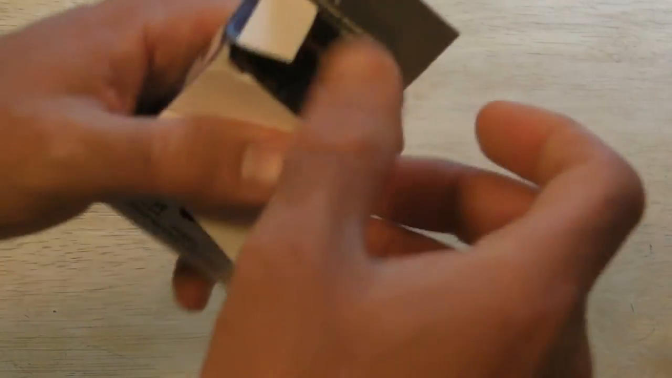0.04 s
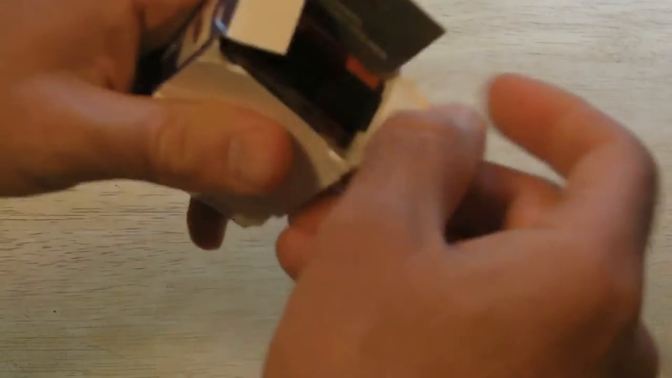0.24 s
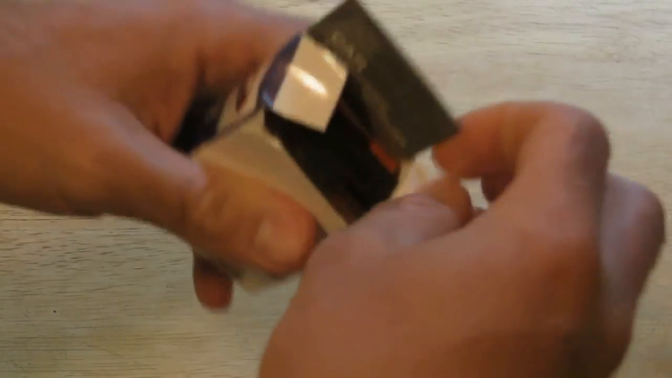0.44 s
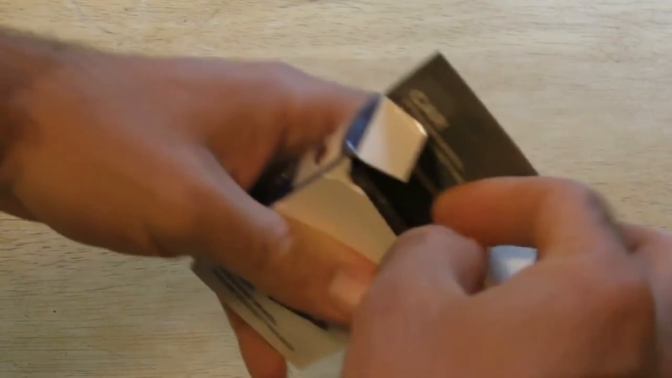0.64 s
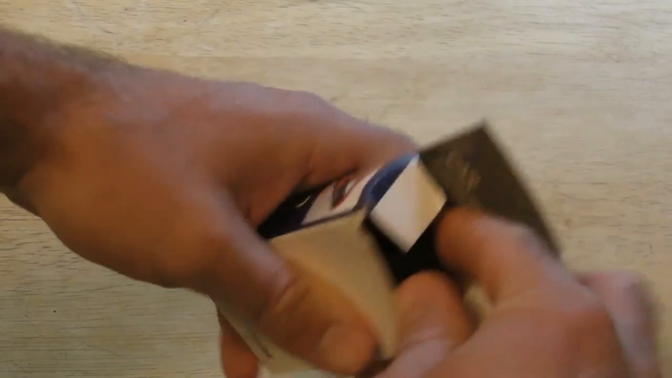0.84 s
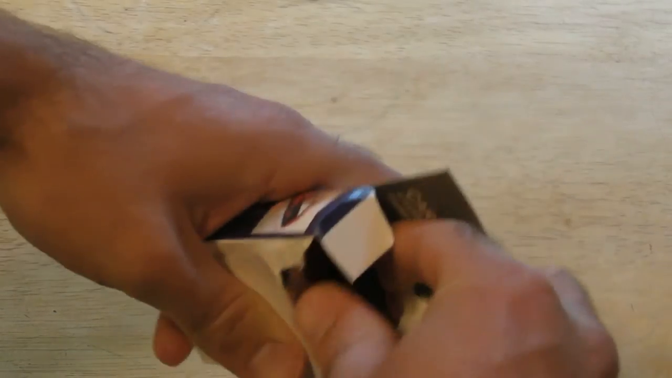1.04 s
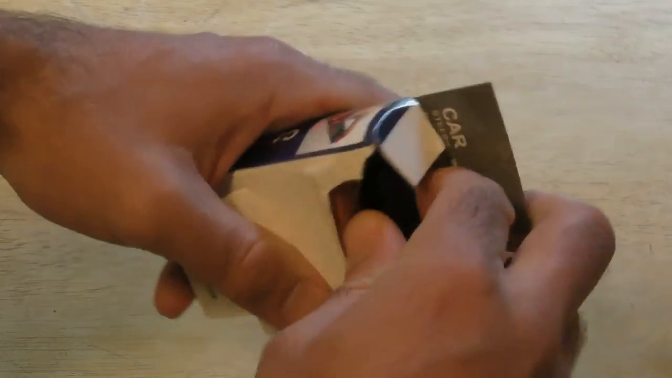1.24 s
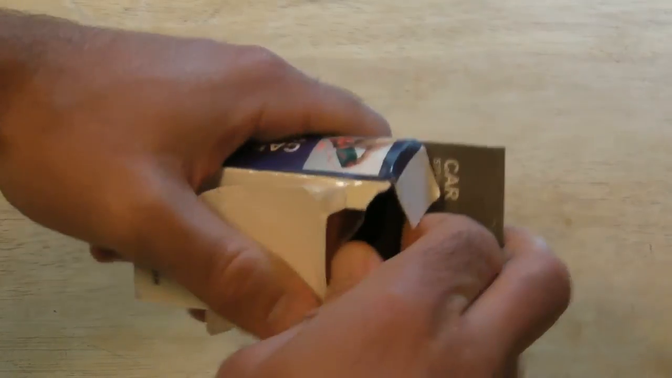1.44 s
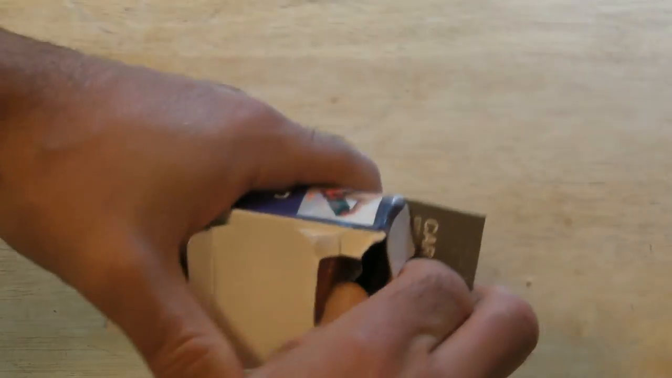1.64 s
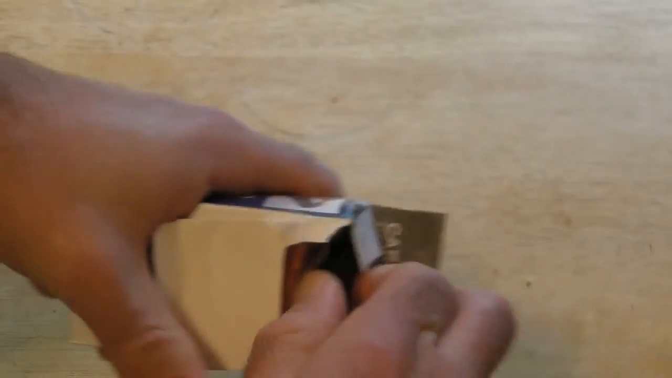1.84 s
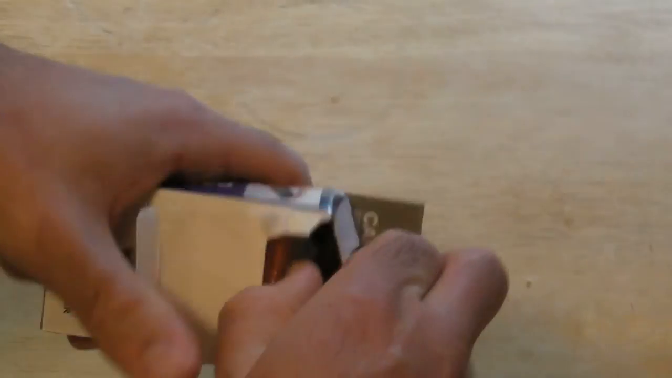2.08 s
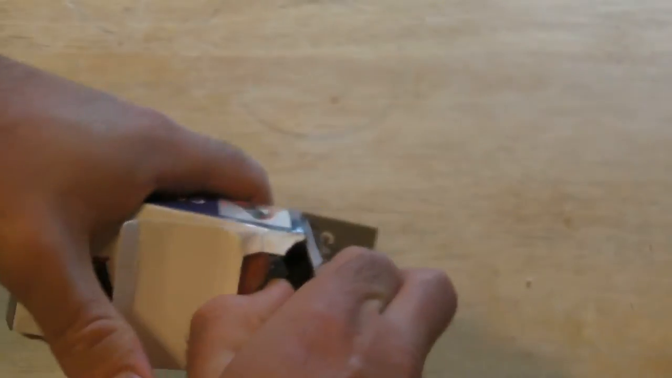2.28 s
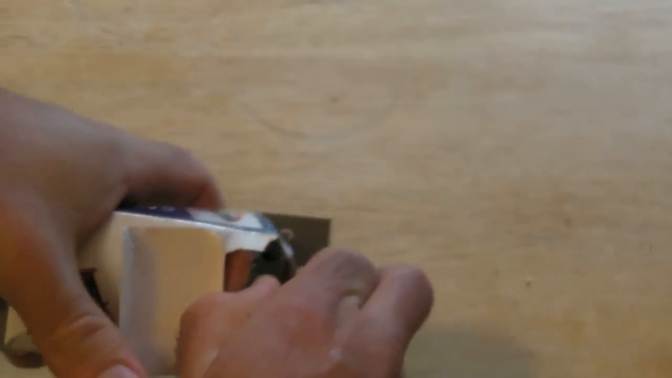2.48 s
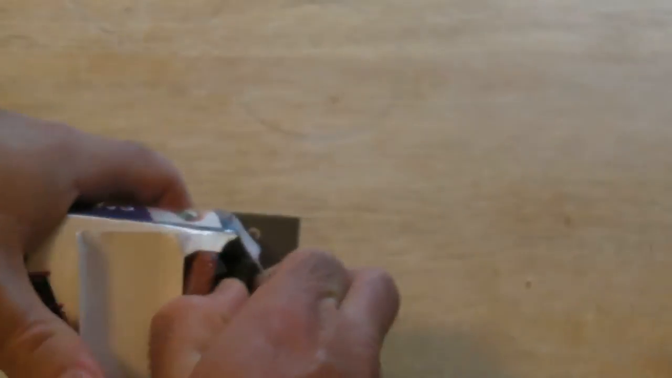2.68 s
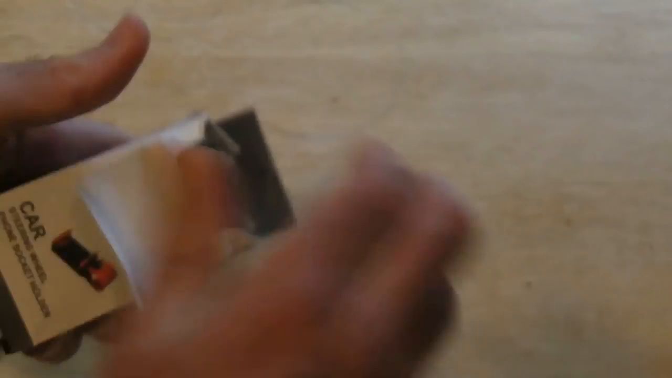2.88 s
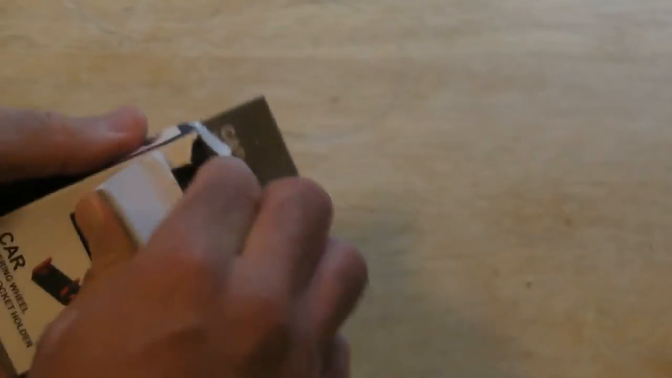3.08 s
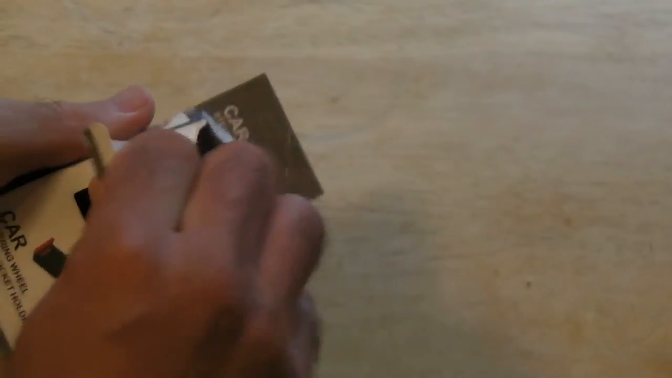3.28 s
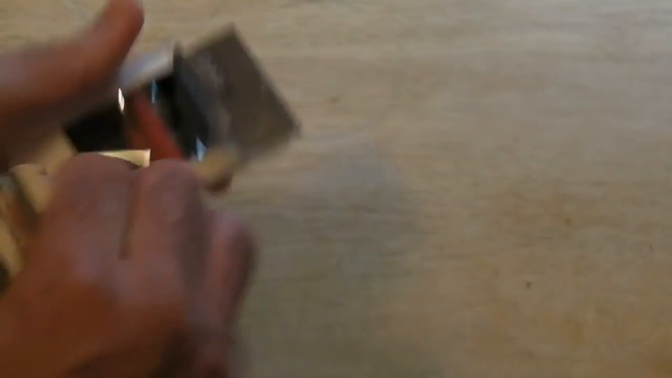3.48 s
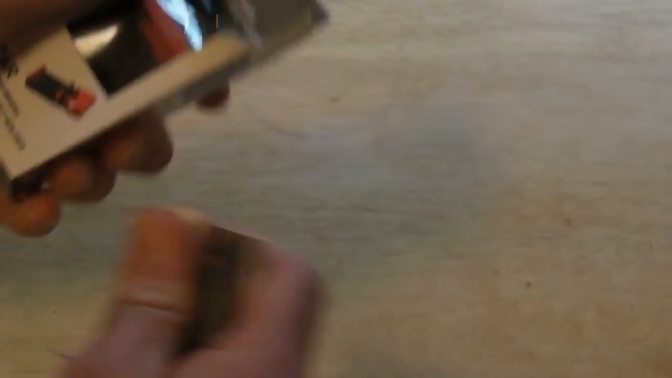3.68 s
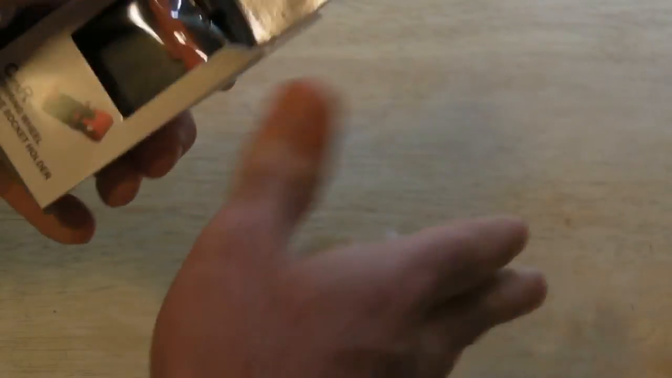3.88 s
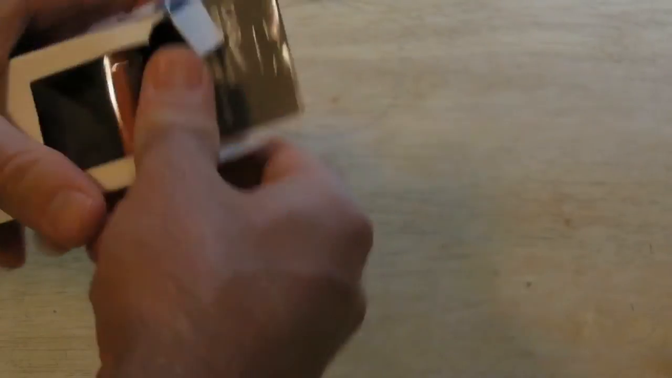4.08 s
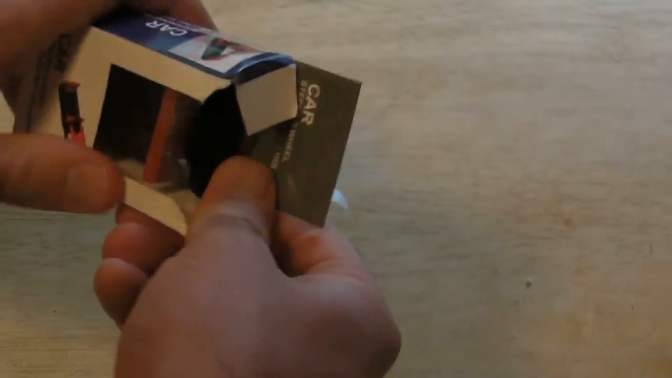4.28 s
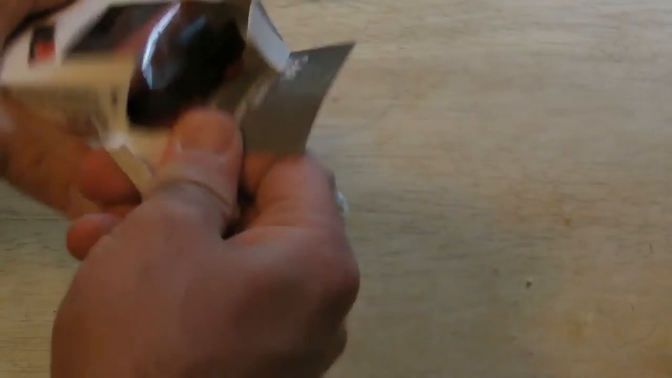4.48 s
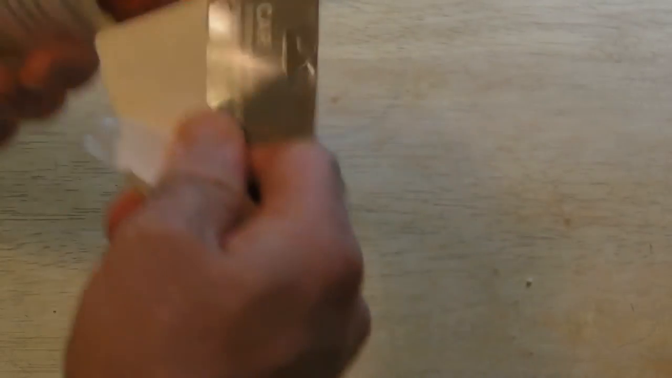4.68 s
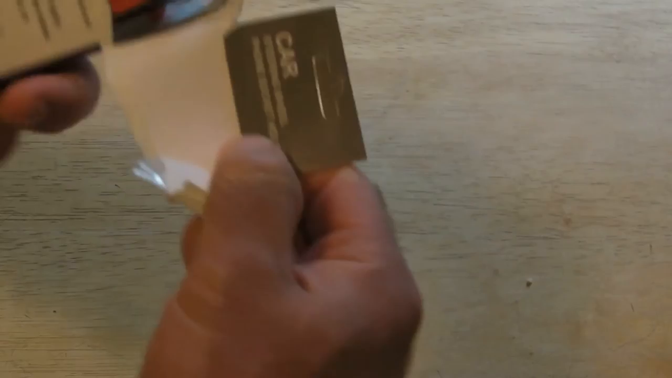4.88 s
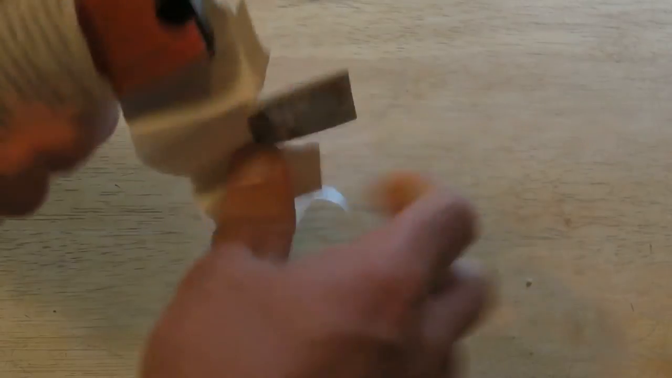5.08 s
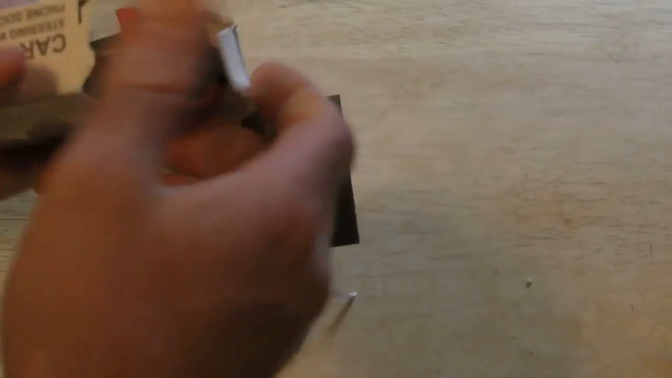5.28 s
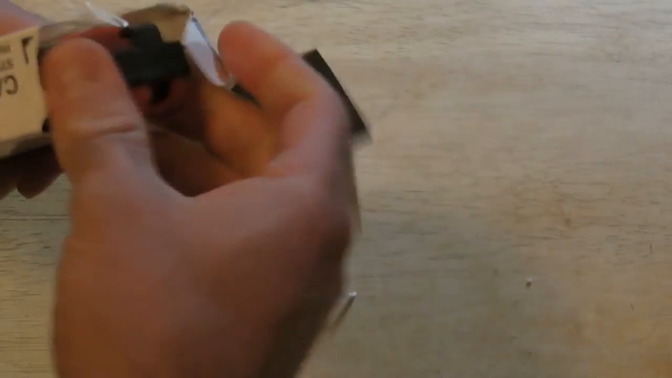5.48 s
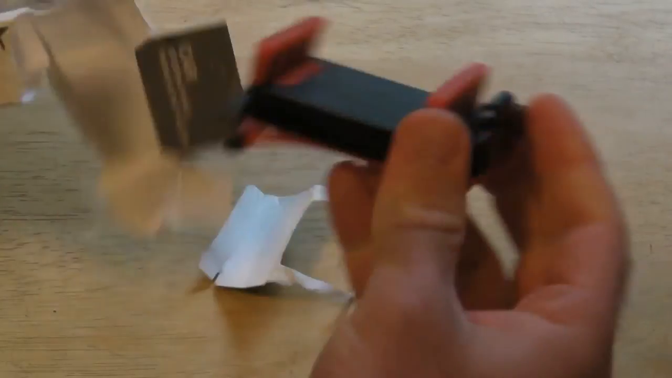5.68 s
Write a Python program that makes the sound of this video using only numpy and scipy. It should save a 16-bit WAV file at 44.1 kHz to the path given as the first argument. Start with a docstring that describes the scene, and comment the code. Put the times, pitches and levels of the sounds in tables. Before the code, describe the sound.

A small stiff card box is handled and opened by two hands above a desk, heard very close in stereo, in a small room with a faint steady rush of air and a short diffuse tail. Light ticks and a catch open the first 0.2 s, then near stillness; a crackling cluster of snaps with a low boxy knock peaks at 0.55-0.66, another sharp snap at 0.8, and a crisp crack with a tiny creak near 1.1. From 1.2 to 2.6 there are only soft scrapes and scattered small clicks. Hard pops with hollow knocks come at 2.73, 2.88 and 2.97, then bright scraping and snaps at 3.15-3.43. It quiets until about 4.0; ticks resume, with snaps and brief creaks at 4.3-4.5 and the strongest rasping scrape and knock at 4.55-4.62. Short scrapes follow at 4.87-5.0, a lull, then a hard bright snapping burst at 5.43-5.5.

```python
"""Small room, desk: two hands work a small cardboard box open, heard from close by.
Creases and tabs snap: noise bursts ring the free edge and the wall modes. The hollow carton knocks (decaying
sines and low noise) and creaks (slip pulses through a gliding resonance).
Flaps and a stiff insert scrape in stick-slip noise grains, and small kinks crackle.
The desk scatters the sound, a diffuse tail rings after it, and shaped noise gives a quiet rush of air."""
import sys
import numpy as np
from scipy import signal
from scipy.fft import rfft, irfft
from scipy.io import wavfile
from scipy.ndimage import uniform_filter1d

SR = 44100
rng = np.random.default_rng(int(sys.argv[2]) if len(sys.argv) > 2 else 0)


def log_audio(samples):
    """Write samples as a 16-bit WAV file to the path given in sys.argv[1]."""
    # one column per channel
    frames = np.atleast_2d(samples).T
    # limit to full scale, then quantise
    limited = np.clip(frames, -1, 1)
    pcm = np.round(limited * 32767).astype(np.int16)
    wavfile.write(sys.argv[1], SR, pcm)


N = 252693

# Room air spectrum: [f/Hz, level/dB]
AIR_SPECTRUM = [(20, -28), (45, -6), (65, -2), (130, 1.5), (200, 0), (280, -3), (370, 6.5), (470, 6),
                (600, -2.5), (1000, -4.5), (2500, -14), (5000, -14.5), (9000, -16.5), (16000, -23)]
AIR_DB = -52
# Room decay: [f/Hz, t60/s]
ROOM_T60 = [(250, 0.34), (660, 0.15), (1550, 0.46), (2200, 0.5), (4600, 0.5), (12000, 0.5)]
# Room tail spectrum: [f/Hz, level/dB]
ROOM_SPECTRUM = [(100, -18), (420, 2.5), (700, -1.5), (1600, -7.5), (2200, -6.5), (3000, -8.5),
                 (4600, -12.5), (6200, -8), (7500, -14), (15000, -12)]

# Noise correlation between the two ports: [f/Hz, likeness 0-1]
PORT_LIKENESS = [(60, 0.6), (500, 0.95), (2000, 0.94), (4500, 0.78), (8000, 0.64), (14000, 0.5)]
# Phase by which left leads right: [f/Hz, lead/rad]
PORT_LEAD = [(2000, 0.1), (5000, 0.099), (6500, 1), (9000, 1), (15000, 1)]
# Right minus left: [f/Hz, level/dB]
PORT_BALANCE = [(100, 2), (500, 1.8), (4400, 1.77), (14000, 0.5)]
CUT_HZ = 15950

# Bending modes of the carton walls, before detuning: [f/Hz, level/dB]
WALL_MODES = [(1080, 0), (1270, -3), (1390, -1), (1570, -0.5), (1700, 1), (1850, 1.5), (2200, -4.5),
              (2480, -2)]
# Where the walls answer most strongly as the grip changes: [t/s, f/Hz]
GRIP = [(0.0, 1900), (0.47, 1530), (0.52, 1770), (1.09, 1720), (1.14, 1380), (1.51, 1840), (1.87, 1740),
        (1.89, 2090), (2.68, 2100), (2.72, 1530), (3.7, 1530), (3.76, 2180), (3.95, 1720), (5.7, 1850)]
# Spectrum of the sliding edge: [f/Hz, level/dB]
EDGE_SPECTRUM = [(900, -25.5), (2000, -26), (2800, -2), (3400, -3.5), (4300, 0), (5200, -3), (6200, -2),
                 (7200, -8.5), (10000, -14)]
# Spectrum of breaking fibres: [f/Hz, level/dB]
FIBRE_SPECTRUM = [(2500, -70), (5500, -17.5), (7200, -5.5), (8500, 0.5), (10000, 0.5), (12500, -1),
                  (16000, -9)]
# Spectrum of the air in the carton: [f/Hz, level/dB]
HOLLOW_SPECTRUM = [(60, -20.5), (270, -28), (370, 5), (520, 1.5), (700, 3), (1000, 4), (1600, -32)]

# Knocks of the hollow carton: [t/s, ring level/dB, ring f/Hz, push level/dB, push f/Hz]
KNOCKS = [(0.548, -39.5, 447, -48.5, 168), (0.659, -28.5, 485, -37, 185), (1.118, -44, 390, -51, 115),
          (1.339, -47, 810, -65, 150), (1.939, -42, 500, -63, 150), (2.075, -35.5, 385, -62, 150),
          (2.737, -38, 800, -46, 162), (2.885, -35, 395, -50, 150), (2.968, -31.5, 750, -64, 149),
          (2.977, -37.5, 443, -60, 150), (3.2, -38, 630, -53, 150), (3.351, -33.5, 366, -44, 98),
          (3.427, -41, 398, -63, 150), (4.116, -35.5, 780, -50, 169), (4.303, -37, 537, -47, 180),
          (4.396, -38.5, 584, -64, 150), (4.549, -24.5, 402, -68, 150), (4.605, -35, 492, -52, 150),
          (4.95, -39.5, 380, -54, 150)]
RATTLE_SHARE = 0.45
# Creaks of card bending under a finger: [start t/s, length/s, level/dB, first f/Hz, last f/Hz]
CREAKS = [(1.078, 0.037, -42, 1780, 2230), (4.313, 0.048, -41, 1150, 1360),
          (4.485, 0.027, -41.5, 2900, 2720)]

# Fingers shifting a little on the box: (edge level/dB, wall level/dB, fibre level/dB)
HANDLING = (-60, -64, -63)
# Hands hold still, the shifting fades out: [start t/s, length/s]
RESTS = [(0.18, 0.09), (3.69, 0.09)]
# Card sliding on card; levels are drives at mid-stroke:
# [start t/s, length/s, edge level/dB, wall level re edge/dB, fibre level re edge/dB]
STROKES = [(-0.003, 0.019, -57, 5, -19), (0.132, 0.04, -50, -17, -10), (0.31, 0.0092, -44.5, -1.5, -1.5),
           (0.395, 0.064, -55, -5, -7), (0.498, 0.01, -38.5, 0, -8), (0.54, 0.11, -48, 1, -1),
           (0.79, 0.098, -39.5, -4, 1), (0.974, 0.029, -41, -9.5, 1), (1.103, 0.031, -36.5, -11, -1),
           (1.216, 0.16, -51.5, -22, -26), (1.593, 0.12, -52, -4, -8), (1.793, 0.032, -49.5, 2, -24),
           (2.054, 0.069, -45.5, -2, -4.5), (2.317, 0.047, -39, -6.5, -4), (2.505, 0.11, -49.5, -10, 0.5),
           (2.656, 0.032, -48.5, 3.5, -11), (2.731, 0.0055, -32.5, 2.5, -4), (3.144, 0.032, -40, 0.5, 0.5),
           (3.186, 0.046, -32, -17, -3), (3.361, 0.083, -32.5, -4, -5.5), (3.515, 0.14, -48, -1.5, -17),
           (3.804, 0.019, -47, -1, -6), (3.936, 0.066, -44, -1, -23), (4.069, 0.053, -42.5, 1, -1.5),
           (4.209, 0.08, -49, 1.5, -15), (4.365, 0.098, -31, -9, -6.5), (4.549, 0.062, -22, -10, -8),
           (4.493, 0.018, -46.5, -14, -9), (4.74, 0.045, -44.5, -7.5, -6), (4.864, 0.026, -31.5, -22, -14),
           (4.872, 0.033, -31, -7, -1), (4.964, 0.023, -38.5, -2, -3), (5.134, 0.004, -44.5, -19, 0),
           (5.193, 0.054, -48, -4.5, -4), (5.32, 0.029, -43.5, -2.5, -13), (5.408, 0.094, -44, -6, -4),
           (5.459, 0.081, -32, 0, -6.5)]
STROKE_ATTACK_S, STROKE_RELEASE_S = 0.0092, 0.011
SAG_DB_PER_S = 27  # a stroke eases off as it goes
# A sliding edge catches and the drag jumps: [t/s, total drive level/dB]
CATCHES = [(0.05, -42), (0.1035, -43), (0.1245, -30), (0.158, -39), (0.517, -33), (0.539, -26.5),
           (0.6545, -11), (0.8007, -30), (1.0925, -32), (1.222, -38), (1.3227, -28.5), (2.0417, -29),
           (2.1001, -37), (3.0558, -31), (3.118, -30.5), (3.3333, -18), (4.0043, -22), (4.218, -39),
           (4.2404, -34), (4.2553, -29), (4.4115, -17), (4.471, -25), (4.5043, -28), (4.584, -19),
           (4.594, -15), (4.598, -7), (4.602, -17), (4.62, -11), (4.8873, -18), (5.2358, -26),
           (5.4479, -11.5), (5.5131, -14)]
CATCH_ATTACK_S, CATCH_RELEASE_S = 0.0004, 0.0016

# Snaps of creases, tabs and edges:
# [t/s, wall level/dB, edge level/dB, edge ring f/Hz, crack level/dB]
SNAPS = [(0.0106, -33, -36.5, 3400, -66), (0.025, -33.5, -28, 4060, -58), (0.037, -32, -39, 3900, -54),
         (0.0894, -27.5, -28, 3560, -44), (0.144, -35.5, -55, 4000, -54), (0.362, -48, -34, 5130, -36.5),
         (0.4494, -41.5, -30.5, 4130, -38), (0.5487, -33, -29, 4240, -37), (0.5765, -26, -20, 3420, -27),
         (0.622, -30, -31, 4900, -39), (0.6271, -22, -24, 3600, -33), (0.6571, -23, -19, 4930, -16),
         (0.8105, -22.5, -18, 3660, -30), (0.9401, -38, -32, 4100, -30.5), (0.945, -37, -30, 4150, -33),
         (0.975, -36, -32, 4140, -34), (1.078, -34, -38, 5500, -41), (1.1162, -26.5, -22.5, 4820, -14),
         (1.128, -32.5, -30, 4250, -44), (1.1856, -30, -32, 3400, -45), (1.339, -33, -38.5, 3020, -48),
         (1.4202, -54, -38, 4700, -41), (1.475, -46, -29, 3650, -35), (1.6106, -31.5, -36, 2540, -41),
         (1.7887, -44, -34.5, 4860, -33.5), (1.9272, -30.5, -26, 3470, -29),
         (2.0083, -28.5, -28, 6660, -31.5), (2.052, -27.5, -33, 2300, -44), (2.082, -54, -40, 4500, -31.5),
         (2.199, -35, -35, 6500, -40), (2.2228, -32, -30, 3100, -29.5), (2.2438, -44, -35, 4300, -32),
         (2.33, -53, -32, 3800, -49), (2.34, -33, -28.5, 5850, -29.5), (2.367, -55, -32, 4600, -35),
         (2.455, -45, -34.5, 4940, -40.5), (2.4927, -54, -37.5, 5030, -39.5),
         (2.5307, -32, -32, 3480, -35.5), (2.6789, -34, -34.5, 5370, -35.5),
         (2.7319, -30, -18.5, 5500, -23), (2.7367, -15.5, -20.5, 5630, -24),
         (2.8845, -17.5, -18.5, 2770, -26), (2.9678, -17.5, -17.5, 3850, -26),
         (3.1015, -33.5, -35, 3870, -44), (3.1482, -25, -39, 3600, -41), (3.152, -29, -24.5, 3200, -38),
         (3.1785, -29, -27, 5000, -43), (3.2022, -21, -20, 6240, -24), (3.2267, -23, -22.5, 3980, -25),
         (3.3073, -34, -22.5, 3560, -24), (3.3232, -24.5, -17.5, 6360, -20.5),
         (3.3443, -26, -14.5, 4400, -29), (3.351, -19.5, -12, 4400, -17), (3.4298, -26, -43, 4400, -44),
         (3.5361, -30, -33, 4050, -62), (3.8134, -30, -30.5, 2620, -53), (3.9551, -31.5, -28, 4570, -42),
         (3.9841, -53, -30.5, 3660, -38), (3.9925, -27, -30, 4000, -46), (4.1167, -24, -28, 4000, -51),
         (4.274, -28.5, -32, 5170, -38), (4.303, -19, -18.5, 5600, -19.5),
         (4.3684, -25.5, -23.5, 5500, -21), (4.3961, -22.5, -23, 4300, -30),
         (4.4615, -29.5, -28, 5030, -33), (4.5482, -18.5, -17, 4200, -20.5), (4.555, -37, -18.5, 4250, -25),
         (4.5684, -50, -14.5, 5800, -25), (4.883, -27, -21, 4560, -31), (4.9501, -29, -30, 4200, -46),
         (4.9835, -32.5, -26, 2900, -25), (5.052, -36.5, -38, 4360, -44), (5.1306, -40, -43, 3280, -61),
         (5.321, -51, -39, 3900, -45), (5.43, -29, -28.5, 4700, -32), (5.4496, -22.5, -15.5, 4860, -30),
         (5.4732, -17, -14.5, 4850, -18.5), (5.4815, -23.5, -10.5, 5360, -19)]
# Soft scrape swelling into each snap: gain at the firm edge level, and dB of change per dB away from it
SWELL_DB, SWELL_S, SWELL_GROWTH, FIRM_SNAP_DB = -23, 0.011, 0.6, -28
# Card sliding to rest after a snap
SETTLE_DB, SETTLE_ATTACK_S, SETTLE_S = -13.5, 0.002, 0.02


def amp(db):
    """Decibels to gain."""
    return 10 ** (np.asarray(db) / 20)


def unit(x):
    """Scale to rms 1."""
    return x / np.sqrt(np.mean(x ** 2) + 1e-20)


def read(points, hz):
    """Interpolate a table on a log-frequency axis."""
    f, value = np.transpose(points)
    return np.interp(np.log(hz + 1), np.log(f + 1), value)


def add(mix, s, sound):
    """Mix a stereo sound in at time s."""
    part = mix[:, max(round(s * SR), 0):][:, :sound.shape[1]]
    part += sound[:, :part.shape[1]]


def blow(x, db, seconds):
    """Give a short sound the energy of level db held for that time."""
    return amp(db) * x * np.sqrt(seconds * SR / (np.sum(x ** 2) / 2 + 1e-20))


def gesture(t, start, length, attack_s, release_s):
    """Exponential attack, hold, exponential release."""
    before = np.minimum(t - start, 0)
    after = np.maximum(t - start - length, 0)
    return np.exp(before / attack_s - after / release_s)


def colour(x, points, size=2048):
    """Minimum-phase filter with the given spectrum; attacks stay sharp."""
    log_gain = np.log(amp(read(points, abs(np.fft.fftfreq(size, 1 / SR)))))
    min_phase = np.exp(np.conj(signal.hilbert(log_gain)))
    taps = np.fft.ifft(min_phase).real[:size // 2]
    return signal.oaconvolve(x, taps[None], axes=1)[:, :x.shape[1]]


def resonate(x, hz, width_hz):
    """Fixed band-pass resonance, peak gain 1."""
    return signal.lfilter(*signal.iirpeak(hz, hz / width_hz, SR), x)


def follow(x, hz, width_hz):
    """Resonance of gain 1 with a movable centre: shift to 0 Hz, low-pass, shift back."""
    turn = np.exp(2j * np.pi * np.cumsum(hz * np.ones(x.shape[1])) / SR)
    pole = np.exp(-np.pi * width_hz / SR)
    return 2 * (turn * signal.lfilter([1 - pole], [1, -pole], x / turn)).real


def noise_pair():
    """White noise at two ports, less alike in the deep bass and the treble."""
    a, b = rfft(rng.standard_normal((2, N)))
    same = np.clip(read(PORT_LIKENESS, np.fft.rfftfreq(N, 1 / SR)), 0, .999)
    return irfft(np.array([a, same * a + np.sqrt(1 - same ** 2) * b]), N)


def air():
    """Steady rush of room air: shaped noise."""
    return amp(AIR_DB) * unit(colour(noise_pair(), AIR_SPECTRUM))


def room(x, build_s=0.0026, apart=0.25, size=24000):
    """Diffuse tail: noise decaying at its own t60 in each band."""
    t = np.arange(size) / SR
    field = unit(noise_pair()[:, :size] + apart * rng.standard_normal((2, size)))
    hz, when, bands = signal.stft(field, SR, nperseg=256)
    t60 = read(ROOM_T60, hz)[:, None]
    decay = amp(read(ROOM_SPECTRUM, hz)[:, None] - 60 * when / t60)
    energy_norm = np.sqrt(np.log(1e6) / (t60 * SR))
    tail = signal.istft(bands * decay * energy_norm, SR, nperseg=256)[1][:, :size]
    tail = tail * (1 - np.exp(-(t / build_s) ** 2))
    return signal.oaconvolve(x, tail, axes=1)[:, :N]


def desk(x, level_db=-9, decay_s=0.011, first_s=.003, density=.15, size=1300):
    """Hands, desk and nearby things scatter the sound: sparse, decaying early echoes."""
    t = np.arange(size) / SR
    echoes = noise_pair()[:, :size] * (rng.random(size) < density)
    echoes = echoes * (t > first_s) * np.exp(-t / decay_s)
    echoes = echoes / np.sqrt(np.sum(echoes ** 2) / 2)
    taps = colour(echoes, [(300, -6.5), (1600, 0.0), (5500, 0.0), (8000, -2.0), (15000, 0.5)])
    return amp(level_db) * signal.oaconvolve(x, taps, axes=1)[:, :N]


def surroundings(x, turn_s=.45, count=4):
    """The box keeps moving: its reflections cycle through a few fixed patterns, once per turn_s."""
    place = np.arange(N) / SR / turn_s - np.arange(count)[:, None] / count
    shares = np.maximum(np.cos(2 * np.pi * place), 0)
    return sum(desk(x * share) + room(x * share) for share in shares)


def knocks(ring_s=0.0055, push_s=0.0084, carton_hz=400, length_s=0.012, size=3000):
    """The carton buckles or bumps a finger: a few cycles of its air, and a soft low push."""
    out, noise, t = np.zeros((2, N)), noise_pair(), np.arange(size) / SR
    for k, (s, db, hz, push_db, push_hz) in enumerate(KNOCKS):
        contact = noise[:, k * size:][:, :size]
        pitch_ratio = (hz / carton_hz) ** 2  # squared; higher knocks are shorter and more rattling
        envelope = np.exp(-t * pitch_ratio / ring_s) * (1 - np.exp(-t * hz))
        ring = np.sin(2 * np.pi * hz * t) * envelope
        rattle = colour(contact * np.exp(-t / ring_s), HOLLOW_SPECTRUM)
        knock = unit(ring) + RATTLE_SHARE * pitch_ratio * unit(rattle)
        push = resonate(contact * np.exp(-t / push_s), push_hz, 1.9 * push_hz)
        push = resonate(push, push_hz, push_hz)
        add(out, s, blow(knock, db, length_s) + blow(push, push_db, length_s))
    return out


def creaks(slips_per_s=420, width_hz=250, jitter=0.263, noise_share=0.15,
           attack_s=0.0035, release_s=0.004, size=4400):
    """Quick uneven slips ring one wall, whose pitch moves as it bends."""
    out, noise, t = np.zeros((2, N)), noise_pair(), np.arange(size) / SR
    for k, (start, length, db, first_hz, last_hz) in enumerate(CREAKS):
        wander = unit(uniform_filter1d(rng.standard_normal(size), size=100))
        turns = np.cumsum(slips_per_s * np.exp(jitter * wander)) / SR
        pulses = np.diff(np.floor(turns), prepend=0)
        drive = unit(pulses) + noise_share * noise[:, k * size:][:, :size]
        hz = np.interp(t, [0, length], [first_hz, last_hz])
        ring = unit(follow(follow(drive, hz, width_hz), hz, 2 * width_hz))
        envelope = (1 - np.exp(-t / attack_s)) * gesture(t, 0, length, attack_s, release_s)
        add(out, start, amp(db) * ring * envelope)
    return out


def walls(x, when, detune, touch_db, quality=14, span_hz=1300):
    """Carton walls ring in their bending modes, weighted by the grip and the place of touch."""
    touch = touch_db * rng.standard_normal(len(WALL_MODES))
    modes = sum(amp(db + touch[k]) * resonate(x, detune * hz, hz / quality)
                for k, (hz, db) in enumerate(WALL_MODES))
    grip_hz = np.interp(when, *np.transpose(GRIP))
    return follow(follow(modes, grip_hz, span_hz), grip_hz, 2 * span_hz)


def sliding():
    """Drive gains of edge, walls and fibres: handling, strokes, catches, swell and settling at snaps."""
    t = np.arange(0, N, 16) / SR
    resting = sum(gesture(t, start, length, STROKE_RELEASE_S, STROKE_ATTACK_S) for start, length in RESTS)
    power = np.outer(amp(HANDLING), 1 - resting) ** 2
    for start, length, db, wall_db, fibre_db in STROKES:
        sag = amp(-SAG_DB_PER_S * (np.clip(t - start, 0, length) - length / 2))
        stroke = sag * gesture(t, start, length, STROKE_ATTACK_S, STROKE_RELEASE_S)
        power += np.outer(amp([db, db + wall_db, db + fibre_db]), stroke) ** 2
    jumps = sum((amp(db) * gesture(t, s, 0, CATCH_ATTACK_S, CATCH_RELEASE_S)) ** 2 for s, db in CATCHES)
    power += jumps * power / power.sum(0)  # a catch keeps the colour of the drag it interrupts
    for s, wall_db, edge_db, _, crack_db in SNAPS:
        swell_db = SWELL_DB + SWELL_GROWTH * (edge_db - FIRM_SNAP_DB)  # more before hard snaps
        swell = amp(swell_db) * gesture(t, s, 0, SWELL_S, SETTLE_ATTACK_S)
        settle = amp(SETTLE_DB) * gesture(t, s, 0, SETTLE_ATTACK_S, SETTLE_S)
        power += np.outer(amp([edge_db, wall_db, crack_db]), swell + settle) ** 2
    return [np.interp(np.arange(N) / SR, t, np.sqrt(p)) for p in power]


def slips(per_s, spread_db, grain_s=0.00067):
    """Stick-slip power, locally levelled: many tiny slips, a few larger, each dying at once."""
    strength = amp(spread_db * np.minimum(rng.exponential(1, N), 3.5))
    hits = strength * (rng.random(N) < per_s / SR)
    power = signal.lfilter([1], [1, -np.exp(-2 / (grain_s * SR))], hits ** 2)
    return power / (uniform_filter1d(power, size=2000) + 1e-3 * power.mean())


def scrape(edge, wall, fibre, own_share=0.94, smooth_share=0.1, catch_db=3.5, fuse_db=-33,
           fast_spread_db=1.0, slow_spread_db=3.0, hollow_db=-12, rasp_db=-1, rasp_hz=4750, rasp_width_hz=1700):
    """Card drags over card: common slips plus own ones drive edge, walls, fibres and inner air."""
    slow = 1 / (1 + edge / amp(fuse_db))  # a slow drag ticks and catches, a fast one fuses into a rasp
    drift = uniform_filter1d(uniform_filter1d(rng.standard_normal(N), size=700), size=400)
    uneven_db = fast_spread_db + slow_spread_db * slow
    shared = slips(800, uneven_db)

    def grains():
        """Noise gated by the common slips and a fresh set."""
        own = slips(1400, uneven_db)
        return noise_pair() * np.sqrt(shared + own_share * own + smooth_share)

    ticks = unit(colour(grains(), EDGE_SPECTRUM))
    rasp = amp(rasp_db) * unit(resonate(colour(grains(), EDGE_SPECTRUM), rasp_hz, rasp_width_hz))
    panel = unit(walls(grains(), np.arange(N) / SR, detune=0.91, touch_db=16.5, quality=3.2, span_hz=1010))
    fizz = unit(colour(grains(), FIBRE_SPECTRUM))
    hollow = amp(hollow_db) * unit(colour(grains(), HOLLOW_SPECTRUM))
    drag = edge * (np.sqrt(slow) * ticks + np.sqrt(1 - slow) * rasp)
    drag = drag + wall * panel + fibre * fizz + np.sqrt(wall * edge) * hollow
    return amp(catch_db * slow * unit(drift)) * drag


def crackle(edge, per_s=220, spread_db=5, level_db=-5.0, low_hz=3000, high_hz=7000,
            count=14, decay_cycles=3.5, size=400):
    """Small kinks give way while the card slides, each a short ring at one of several pitches."""
    t, out = np.arange(size) / SR, np.zeros((2, N))
    strength = amp(spread_db * np.minimum(rng.exponential(1, N), 3))
    kinks = strength * (rng.random(N) < per_s / SR)
    which = rng.integers(0, count, N)
    for k, hz in enumerate(np.geomspace(low_hz, high_hz, count)):
        phase = .5 * rng.standard_normal((2, 1))
        ring = np.sin(2 * np.pi * hz * t + phase) * np.exp(-t * hz / decay_cycles)
        out += signal.oaconvolve((kinks * (which == k))[None], ring, axes=1)[:, :N]
    return amp(level_db) * edge * unit(resonate(out, np.sqrt(low_hz * high_hz), high_hz))


def snaps(crack_s=0.00048, edge_s=0.001, step_min_s=0.00066, step_max_s=0.00176, step_share=0.48,
          edge_width_hz=1900, damping_s=0.02, grip_spread=0.027, length_s=0.003, size=1400):
    """A crease gives way in two quick steps: fibres crack, the free edge rings, the walls answer."""
    out, noise, t = np.zeros((2, N)), noise_pair(), np.arange(size) / SR
    detunes = 1 + grip_spread * rng.uniform(-1, 1, len(SNAPS))
    delays_s = rng.uniform(step_min_s, step_max_s, len(SNAPS))
    fingers = np.exp(-t / damping_s)  # the fingers damp the walls
    for k, (s, wall_db, edge_db, hz, crack_db) in enumerate(SNAPS):
        def slip(seconds):
            """Noise burst with a second, weaker step."""
            second_step = step_share * np.exp(-((t - delays_s[k]) / seconds) ** 2)
            return noise[:, k * size:][:, :size] * (np.exp(-t / seconds) + second_step)

        crack = colour(slip(crack_s), FIBRE_SPECTRUM)
        edge = colour(resonate(slip(edge_s), hz, edge_width_hz), EDGE_SPECTRUM)
        panel = fingers * walls(slip(crack_s), s, detunes[k], touch_db=3.5, span_hz=690)
        add(out, s, blow(crack, crack_db, length_s))
        add(out, s, blow(edge, edge_db, length_s))
        add(out, s, blow(panel, wall_db, length_s))
    return out


def scene():
    """Room air, the box and its reflections."""
    edge, wall, fibre = sliding()
    box = knocks() + creaks() + scrape(edge, wall, fibre) + crackle(edge) + snaps()
    return air() + surroundings(box) + box


def record(dry):
    """Ports differ a little in phase and level; peaks clip; a low-pass limits the band."""
    hz = np.fft.rfftfreq(N, 1 / SR)
    port = np.exp(.5j * read(PORT_LEAD, hz)) / amp(read(PORT_BALANCE, hz) / 2)
    heard = irfft(rfft(dry) * np.array([port, 1 / port]), N)
    heard = np.clip(heard, -.95, .95)
    low_pass = signal.firwin(511, CUT_HZ, window=("kaiser", 9), fs=SR)
    return signal.oaconvolve(heard, low_pass[None], "same")


dry = scene()
out = record(dry)
log_audio(out)
```